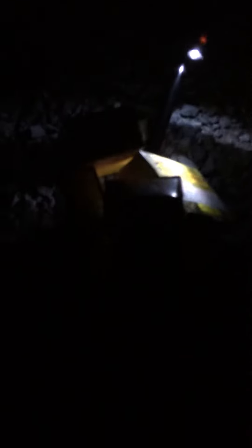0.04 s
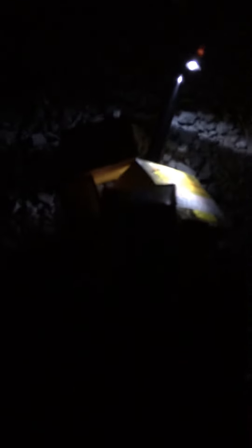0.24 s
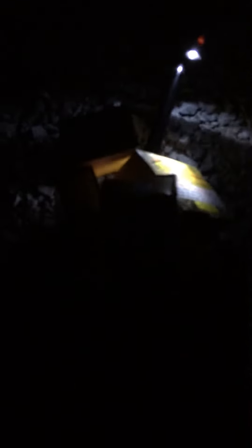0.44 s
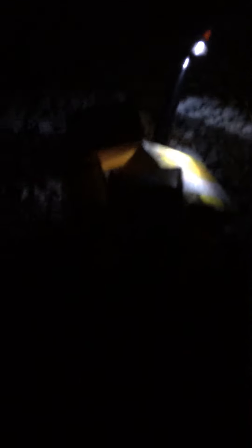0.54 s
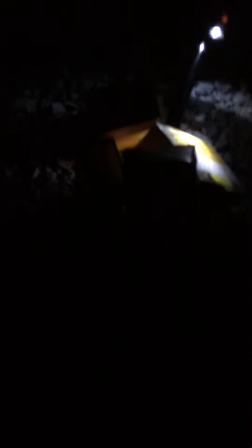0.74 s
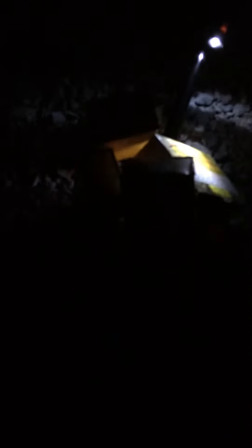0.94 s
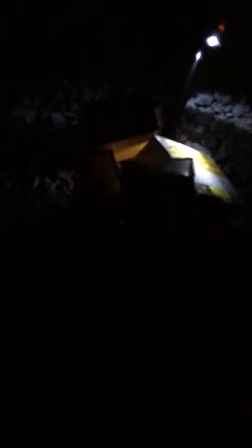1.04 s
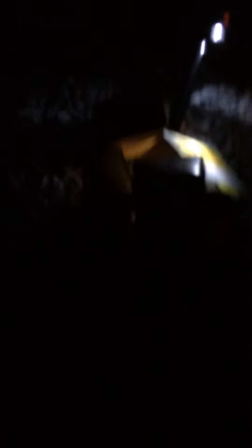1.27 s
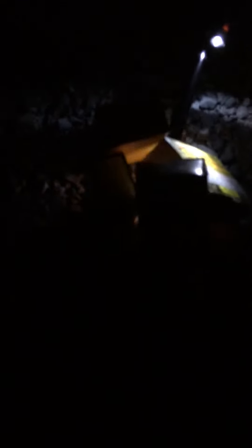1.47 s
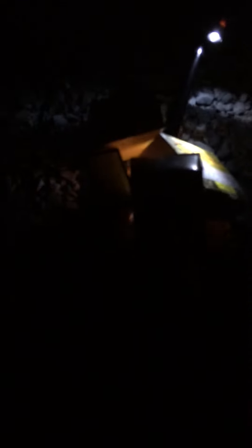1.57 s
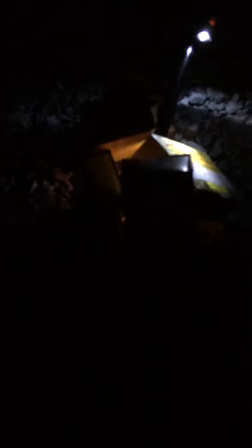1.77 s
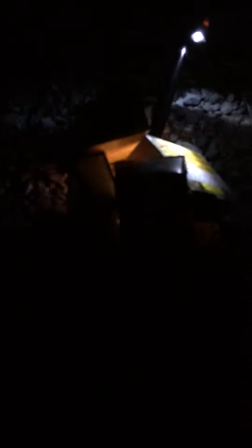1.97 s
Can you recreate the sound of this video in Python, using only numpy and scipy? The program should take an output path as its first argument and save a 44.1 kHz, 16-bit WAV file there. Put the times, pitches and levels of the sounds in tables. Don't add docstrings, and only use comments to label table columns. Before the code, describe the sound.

A distant chorus of crickets throbs in quick, regular high swells over a steadier trill; close to the microphone, gravel crunches softly then more sharply, and a bright click snaps near the end, over faint traffic rumble.

```python
import sys
import numpy as np
from scipy import signal
from scipy.io import wavfile
from scipy.ndimage import uniform_filter1d

SR = 44100
rng = np.random.default_rng(int(sys.argv[2]) if len(sys.argv) > 2 else 0)


def transcribe(signal):
    frames = np.atleast_2d(signal).T
    limited = np.clip(frames, -1, 1)
    pcm = np.round(limited * 32767).astype(np.int16)
    wavfile.write(sys.argv[1], SR, pcm)


def boost_factor(decibels):
    exponent = np.asarray(decibels, float) / 20
    return 10 ** exponent


N = 88729

# loudest_s [s], level_db [dB]
THROBS = [
    (0.0, -52.5),
    (.24, -48.5),
    (0.528, -49),
    (.77, -48),
    (1.046, -47),
    (1.32, -48),
    (1.581, -48),
    (1.83, -48),
    (1.93, -53),
]
THROB_S, BETWEEN_DB = 0.062, -53.5
WING_HZ, WING_SPREAD_HZ, WING_WIDTH_HZ, OCTAVE_DB = 7039, 235, 256, -28
STRIKES_PER_S = 900
LOW_HZ, LOW_SPREAD_HZ, LOW_WIDTH_HZ, LOW_DB = 6322, 384, 147, -60

# time_s [s], level_db [dB]
TREE_LEVEL = [(0, -67.5), (.17, -64), (.3, -67.5), (.36, -67.5), (.45, -63.5), (.54, -60), (.57, -63.5),
              (.63, -61.5), (.82, -62.5), (.97, -63.5), (1.09, -66.5), (1.16, -68.5), (1.23, -62),
              (1.4, -61), (1.55, -62.5), (1.78, -63.5), (1.94, -63.5), (2.01, -63)]
TREE_HZ, TREE_SPREAD_HZ = 3015, 32
TREE_PULSES_PER_S, TREE_DUTY = 72, 0.76
TREE_WOBBLE_DB, TREE_FAR = 3.5, 1.02

# start_s [s], length_s [s], level_db [dB], centre_hz [Hz], grit_db [dB]
CRUNCHES = [
    (.8265, .011, -57, 1700, 1),
    (.836, .009, -57, 2200, -2),
    (.846, .028, -60, 1100, -9),
    (.8745, .008, -60, 5000, -12),
    (.876, .006, -58, 2000, -20),
    (.882, .012, -54, 1600, -18),
    (.452, .078, -61, 1000, -12),
    (1.29, .06, -69, 3500, -20),
    (1.845, .03, -66, 3500, -20),
    (1.88, .13, -64, 4500, -14),
]
GRAINS_PER_S, GRAIN_SPREAD_DB = 3500, 3.5
# time_s [s], peak_db [dB], centre_hz [Hz],
# width_hz [Hz]
TICKS = [(.4462, -40, 1950, 750), (.4495, -51, 1500, 800), (.464, -54, 1400, 600), (.470, -47, 650, 500),
         (.471, -53, 1900, 1100), (.483, -45, 1200, 700), (.492, -50, 2100, 900), (.500, -50, 1300, 800),
         (.509, -48, 1500, 800), (.518, -51, 1700, 900), (.552, -50, 800, 700), (.637, -44.5, 3500, 3000),
         (.8628, -38.5, 1400, 1300), (.8662, -47, 1500, 700), (.866, -52, 4500, 1500),
         (1.262, -50, 2200, 1500), (1.725, -53, 4000, 2500), (1.861, -48, 2300, 1500),
         (1.892, -53, 4500, 2000), (1.957, -49.5, 5000, 1500),
         (.8272, -45, 3500, 3000), (.8305, -45, 1200, 900), (.8325, -48, 4800, 1800),
         (.8335, -42, 2000, 2400), (.8338, -45, 9300, 2500), (.8385, -39, 900, 700),
         (.8398, -38, 1600, 1000), (.8415, -47, 2700, 1200), (.8432, -38, 750, 600),
         (.8445, -39, 1300, 800), (.8765, -44, 800, 800), (.8816, -39, 900, 900), (.882, -43, 2500, 900),
         (.8853, -34.5, 1800, 1200), (.8878, -39.5, 1400, 600), (.8903, -37.5, 900, 700),
         (.8915, -42, 2200, 1200), (.8935, -46, 1000, 700)]

CLICK_S, CLICK_DB = 1.826, -39.5
# delay_s [s], level_db [dB]
CLICK_TAPS = [
    (-.0023, -19),
    (0, 0),
    (.00103, -2),
    (.0038, -18),
]
# pitch_hz [Hz], level_db [dB], t60_s [s]
CLICK_MODES = [(2100, -24, .004), (4700, -9, .006), (5700, -8, .005), (8500, -7, .006), (9400, -8, .005),
               (10750, 0, .0065), (13500, -16, .004), (15000, -21, .004)]

# freq_hz [Hz], density_db [dB per Hz]
RUMBLE = [(12, -47), (20, -51), (50, 0), (87, 1), (151, -1), (325, -14.5), (464, -19), (513, -31.5),
          (600, -24.5), (780, -26), (1320, -120)]
RUMBLE_DB = -50
# time_s [s], level_db [dB]
GUST = [(0, 1.5), (.08, 2), (.19, -1.5), (.27, 3.5), (.35, -5.5), (.4, 1), (.55, -0.5), (.6, -0.5),
        (.81, -2), (.92, 1.5), (1.05, 0), (1.15, 2), (1.3, -3), (1.53, 1), (1.7, -4), (1.8, -1),
        (1.92, 5.5), (2.01, -2)]
# pitch_hz [Hz], width_hz [Hz], level_db [dB]
DRONE = [
    (80.5, 9.3, -64),
    (155.8, 41.6, -59),
]
# time_s [s], level_db [dB]
DRONE_SWELL = [(0, -4), (.12, 1), (.22, 7.5), (.33, 6.5), (.42, -4), (.5, -8), (.6, 3.5), (.7, 7), (.8, 4),
               (.9, -3), (1.0, 2), (1.15, 4), (1.3, -10), (1.5, -6), (1.7, -8), (1.85, -4), (2.01, -2)]
# freq_hz [Hz], density_db [dB per Hz]
AIR = [(250, 2.5), (500, 0.5), (1200, -3.5), (2200, -7), (3800, -11.5), (5500, -9.5), (8000, -23.5),
       (12500, -24.5), (15500, -38.5)]
AIR_DB = -58.5
# time_s [s], level_db [dB]
STIR = [(0, -83), (.42, -84), (.5, -70.5), (.64, -74), (.7, -93), (1.1, -84), (1.16, -76), (1.24, -75),
        (1.52, -81), (1.58, -70), (1.72, -76), (1.78, -86), (1.9, -101), (1.94, -68), (2.01, -91)]


def evened(x):
    return x / np.sqrt(np.mean(x ** 2) + 1e-20)


def curve(points):
    s, value = np.transpose(points)
    return np.interp(np.arange(N) / SR, s, value)


def add(mix, s, sound):
    part = mix[round(s * SR):][:len(sound)]
    part += sound[:len(part)]


def resonate(x, hz, width_hz):
    turn = np.exp(2j * np.pi * hz * np.arange(len(x)) / SR)
    r = np.exp(-np.pi * width_hz / SR)
    return 2 * (turn * signal.lfilter([1 - r], [1, -r], x / turn)).real


def resonate_twice(x, hz, width_hz):
    return resonate(resonate(x, hz, width_hz), hz, width_hz)


def drift(per_s):
    t = np.arange(N) / SR
    rates = per_s * np.linspace(.15, 1, num=8)
    return evened(sum(np.sin(2 * np.pi * (f * t + rng.random())) for f in rates))


def noise(shape, patchy_db, size):
    frames, hz = 4 * N // size + 5, np.fft.rfftfreq(size, 1 / SR)
    a, b, patches = rng.standard_normal((frames, len(hz), 3)).T
    patches = uniform_filter1d(patches, size=size // 64, axis=0)
    patches = evened(uniform_filter1d(patches, size=8, axis=1))
    f, db = np.transpose(shape)
    db = np.interp(np.log(hz + 1), np.log(f + 1), db, left=-80)
    z = (a + 1j * b) * boost_factor(db[:, None] + patchy_db * patches)
    return evened(signal.istft(z, nperseg=size, noverlap=size - size // 4)[1][:N])


def singers(hz, spread_hz, width_hz, count):
    out = np.zeros(N)
    for place in np.linspace(-1.5, 1.5, num=count):
        strikes = rng.standard_normal(N) * (rng.random(N) < STRIKES_PER_S / SR)
        out += np.exp(-place ** 2 / 2) * resonate_twice(strikes, hz + spread_hz * place, width_hz)
    return evened(out)


def throbbing_chorus():
    t = np.arange(N) / SR
    swells = sum(boost_factor(db) ** 2 * np.exp(-((t - s) / THROB_S) ** 2) for s, db in THROBS)
    power = boost_factor(BETWEEN_DB) ** 2 + swells
    octave = singers(2 * WING_HZ, 2 * WING_SPREAD_HZ, 1100, count=5)
    wings = singers(WING_HZ, WING_SPREAD_HZ, WING_WIDTH_HZ, count=11)
    return np.sqrt(power) * (wings + boost_factor(OCTAVE_DB) * octave)


def lower_chorus():
    level = boost_factor(LOW_DB + 0.99 * drift(13))
    return level * singers(LOW_HZ, LOW_SPREAD_HZ, LOW_WIDTH_HZ, count=9)


def tree_crickets():
    t, near = np.arange(N) / SR, np.zeros(N)
    for place in np.linspace(-1, 1, num=4):
        stroke = TREE_PULSES_PER_S * (1 + .03 * place) * t + rng.random() + 0.24 * drift(6.6)
        stroke = stroke % 1
        hz = TREE_HZ + TREE_SPREAD_HZ * place + 90 * (.5 - stroke) + 26 * drift(5)
        shape = np.sin(np.pi * np.clip(stroke / TREE_DUTY, 0, 1))
        level = boost_factor(TREE_WOBBLE_DB * drift(21.78) - 5.1 * place)
        near += level * shape * np.sin(2 * np.pi * np.cumsum(hz) / SR)
    far = resonate_twice(rng.standard_normal(N), TREE_HZ + 40, 250)
    return boost_factor(curve(TREE_LEVEL) - 0.5) * evened(evened(near) + TREE_FAR * evened(far))


def crunch(start, length, db, hz, grit_db):
    t = np.arange(0, length + 0.004, 1 / SR)
    chance, side, size = rng.random((len(t), 3)).T
    grains = (chance < GRAINS_PER_S / SR) * np.sign(side - .5)
    grains = grains * boost_factor(-GRAIN_SPREAD_DB * np.log(size + 0.0018))
    grains = grains * np.sin(np.pi * np.clip((t + 0.00091) / (length + 0.00275), 0, 1)) ** .5
    body = resonate(grains, hz, 0.79 * hz) + 1.46 * resonate(grains, 0.69 * hz, 330)
    body = resonate_twice(body, hz, 1.3 * hz)
    spray = 4.1 * np.std(grains) * rng.standard_normal(len(t)) * np.exp(-np.maximum(t - length, 0) / 0.0054)
    grit = resonate(grains + spray, 4670, 7500)
    return start, boost_factor(db) * (evened(body) + boost_factor(grit_db) * evened(grit))


def tick(s, db, hz, width_hz):
    u = np.pi * width_hz * np.arange(400) / SR
    return s, boost_factor(db) * np.e * u * np.exp(-u) * np.sin(2 * hz * u / width_hz)


def click():
    t, out = np.arange(900) / SR, np.zeros(N)
    ring = sum(boost_factor(db - 60 * t / t60) * np.sin(2 * np.pi * hz * t) for hz, db, t60 in CLICK_MODES)
    ring = np.minimum(t / .00015, 1) * ring
    for delay, tap_db in CLICK_TAPS:
        add(out, CLICK_S + delay, boost_factor(CLICK_DB + tap_db) * ring)
    return out


def traffic_rumble():
    return boost_factor(RUMBLE_DB + curve(GUST)) * noise([*RUMBLE, (1200, -56.5)], 0.5, size=4096)


def engine_drone():
    hums = sum(boost_factor(db) * evened(resonate_twice(rng.standard_normal(N), hz, width)) for hz, width, db in DRONE)
    return boost_factor(curve(DRONE_SWELL)) * hums


def air_hiss():
    return boost_factor(AIR_DB) * noise(AIR, 1.53, size=512)


def stirring_grass():
    crackle_db = 0.72 * np.repeat(rng.exponential(1, N // 64 + 1), repeats=64)[:N]
    grass = resonate_twice(rng.standard_normal(N) * boost_factor(crackle_db), 9500, 6300)
    return boost_factor(curve(STIR)) * evened(grass)


def scene():
    mix = throbbing_chorus() + lower_chorus() + tree_crickets() + click()
    mix += traffic_rumble() + engine_drone() + air_hiss() + stirring_grass()
    for row in CRUNCHES:
        add(mix, *crunch(*row))
    for row in TICKS:
        add(mix, *tick(*row))
    return mix[None]


def low_pass(x):
    return signal.sosfilt(signal.butter(12, 15740, fs=SR, output="sos"), x)


def record(dry):
    return low_pass(dry)


dry = scene()
out = record(dry)
transcribe(out)
```